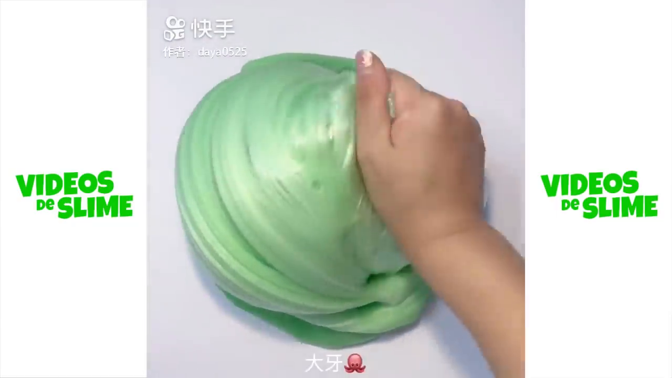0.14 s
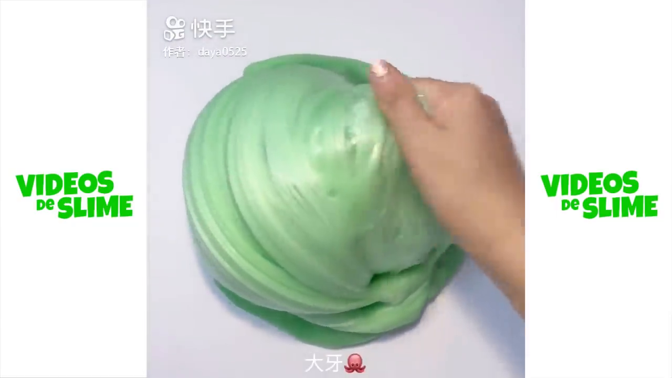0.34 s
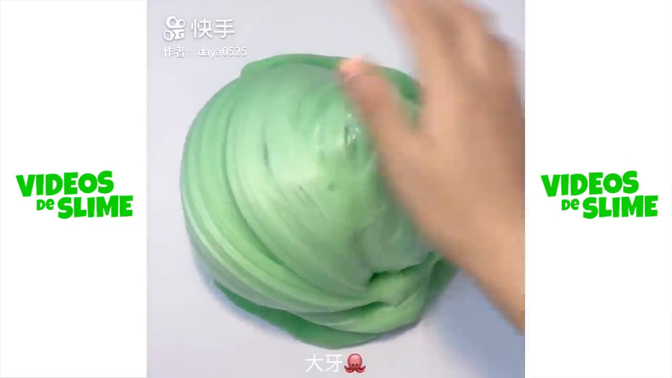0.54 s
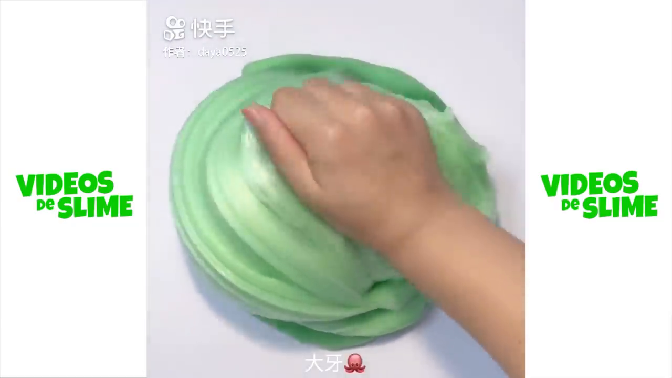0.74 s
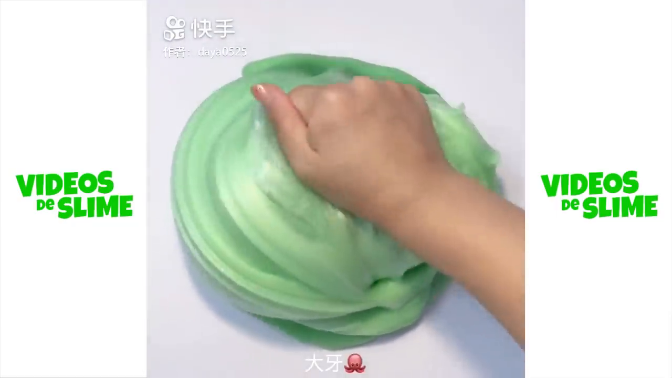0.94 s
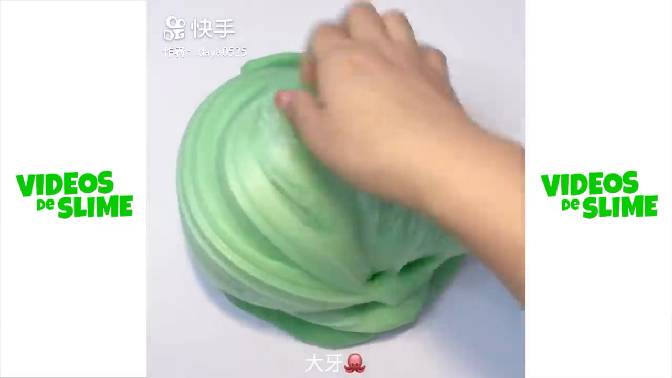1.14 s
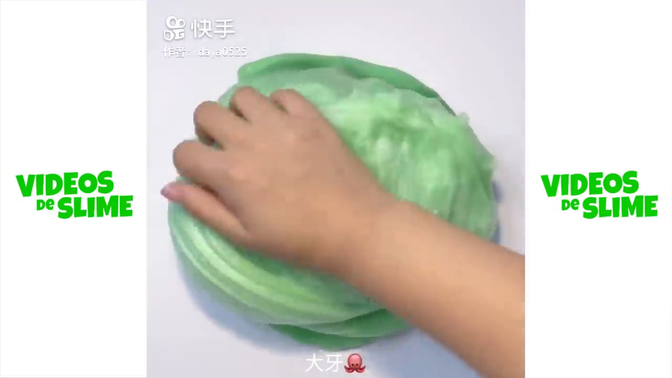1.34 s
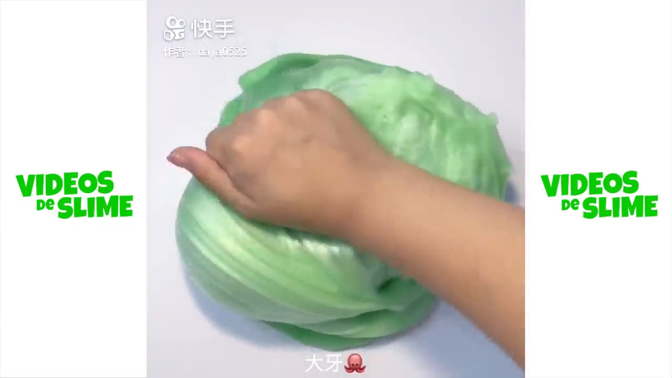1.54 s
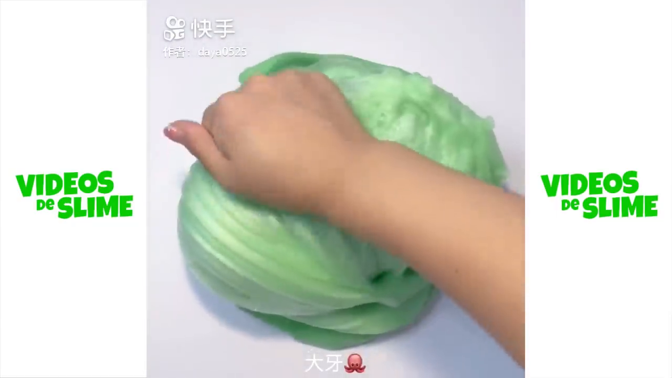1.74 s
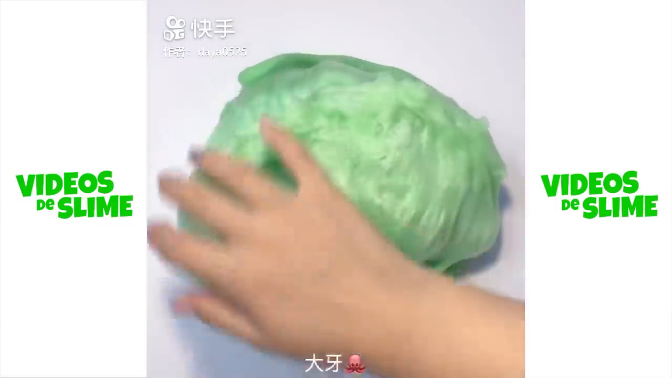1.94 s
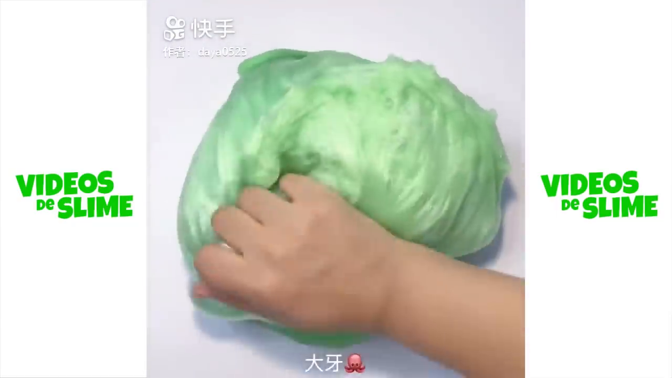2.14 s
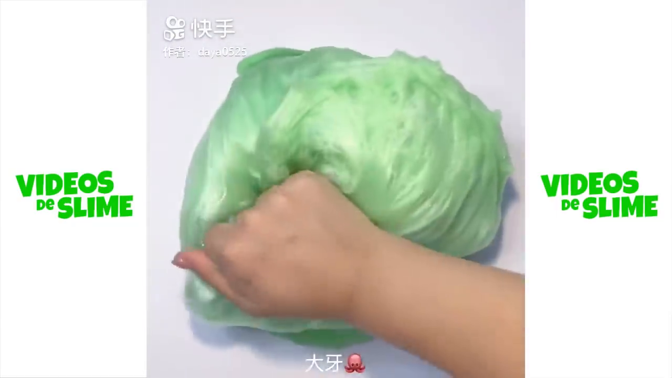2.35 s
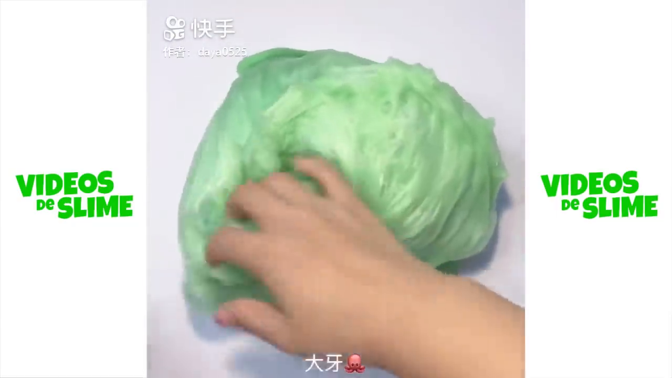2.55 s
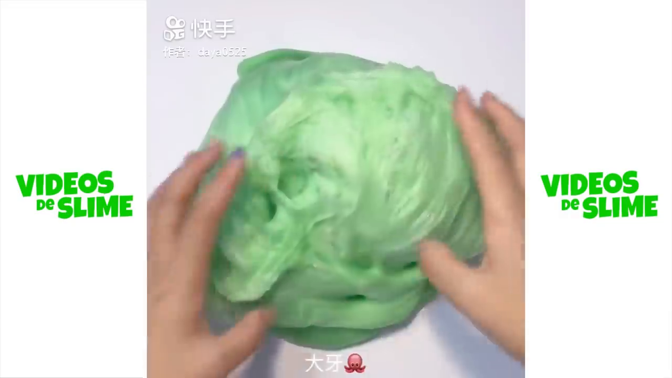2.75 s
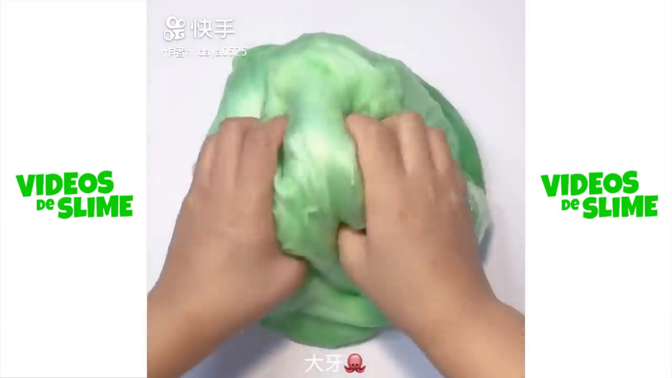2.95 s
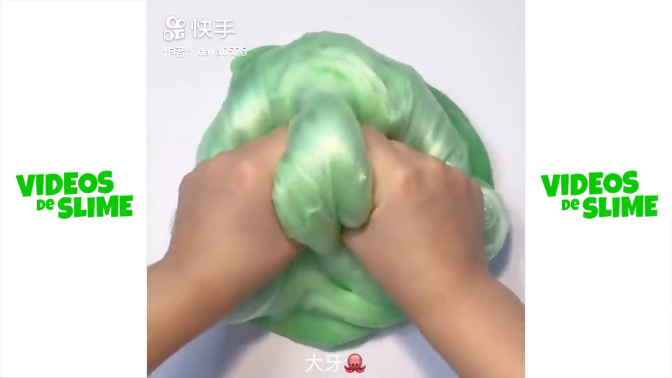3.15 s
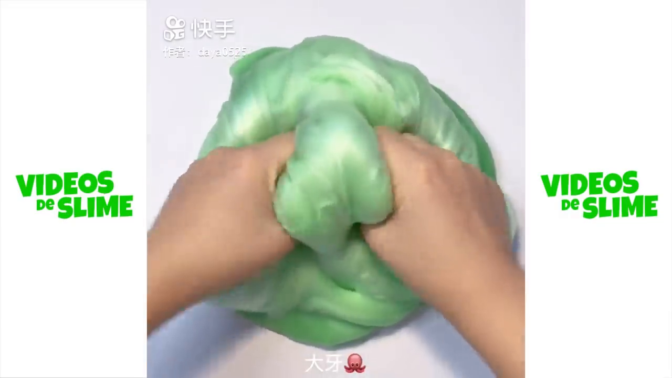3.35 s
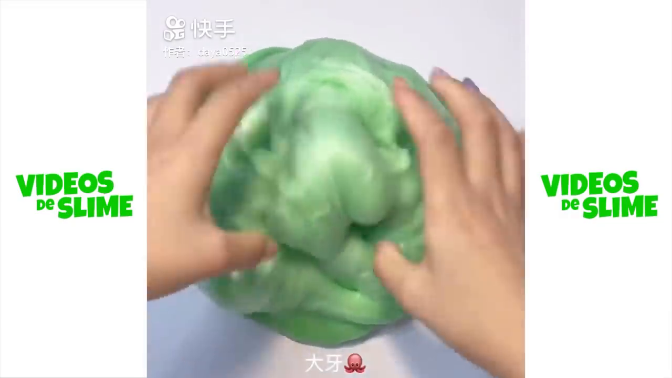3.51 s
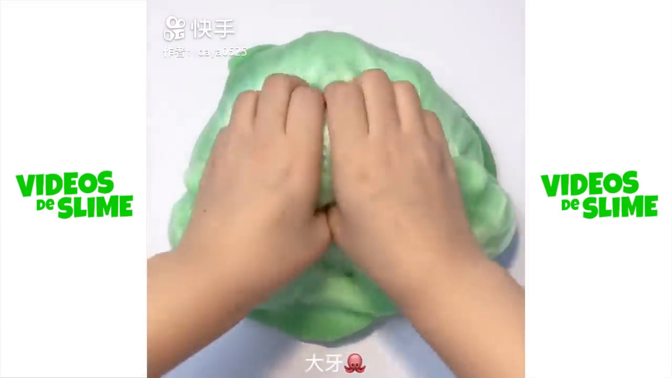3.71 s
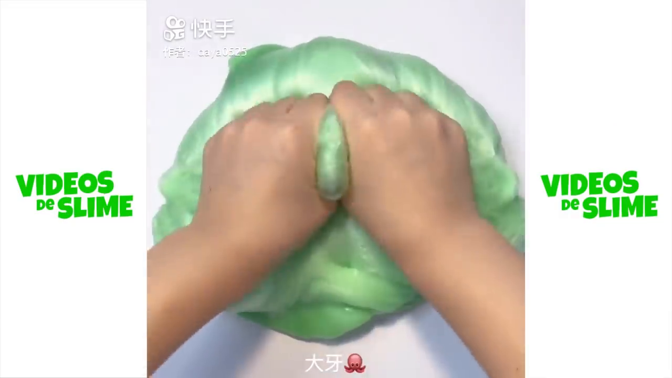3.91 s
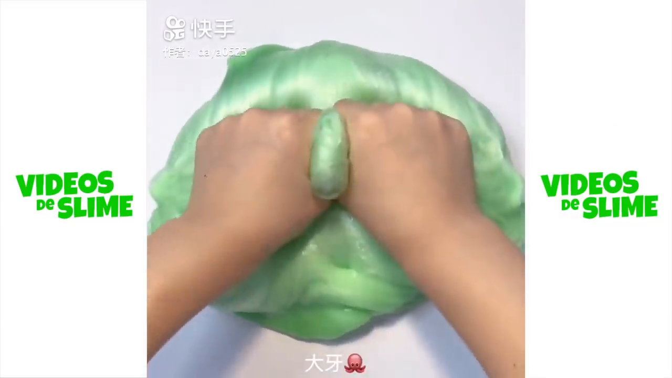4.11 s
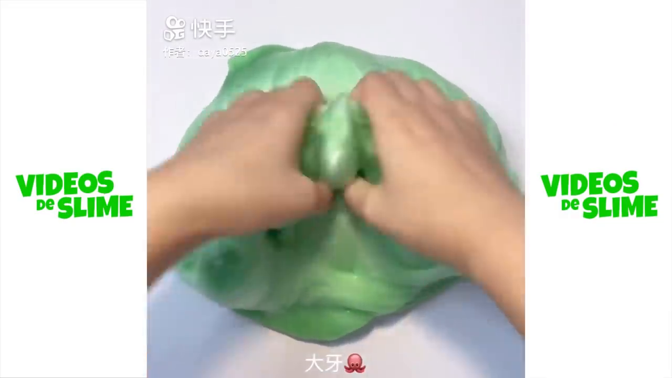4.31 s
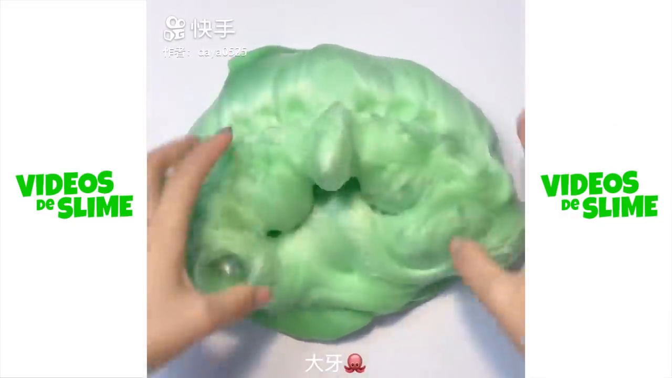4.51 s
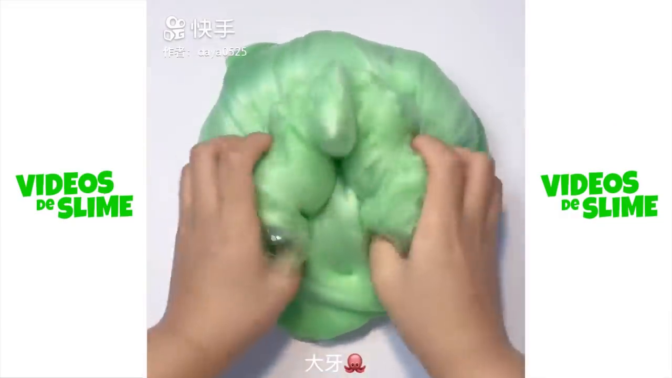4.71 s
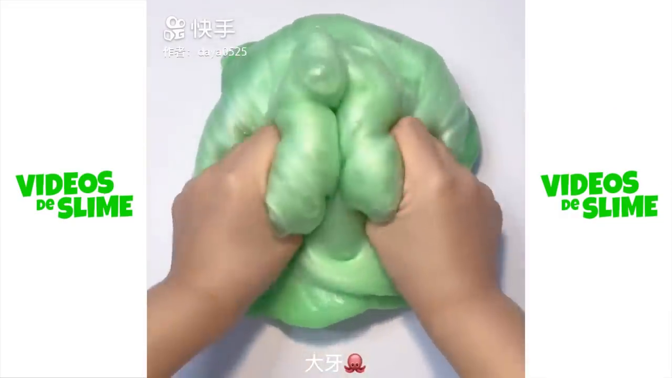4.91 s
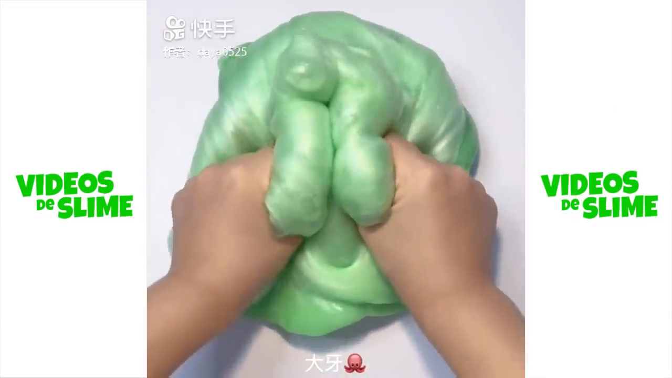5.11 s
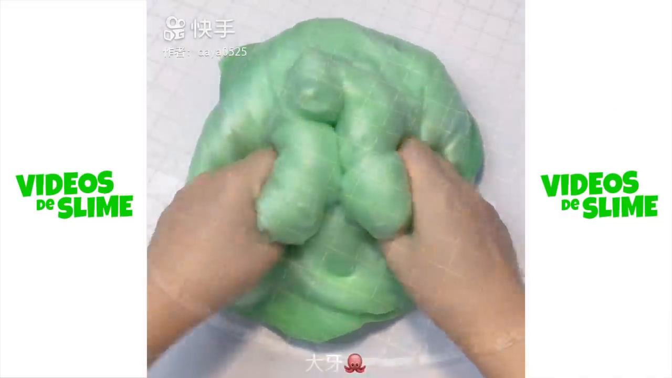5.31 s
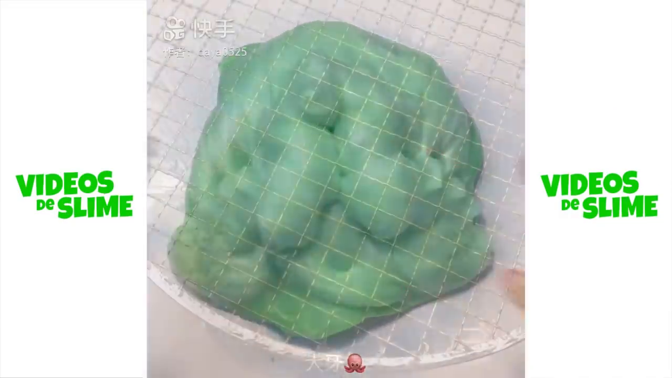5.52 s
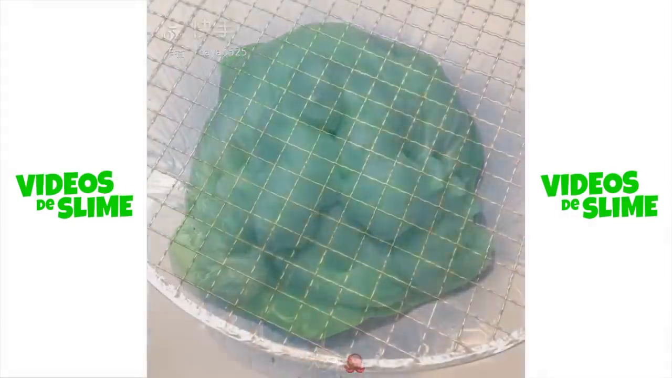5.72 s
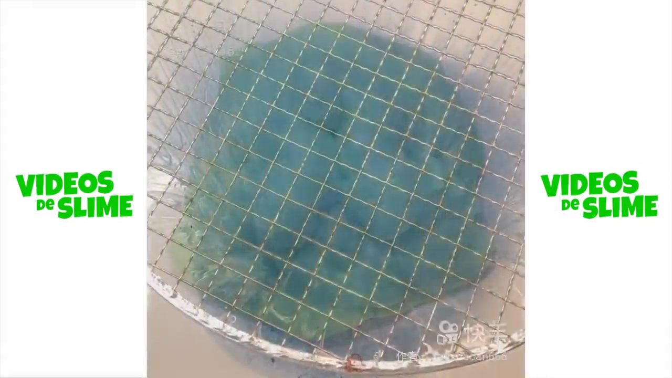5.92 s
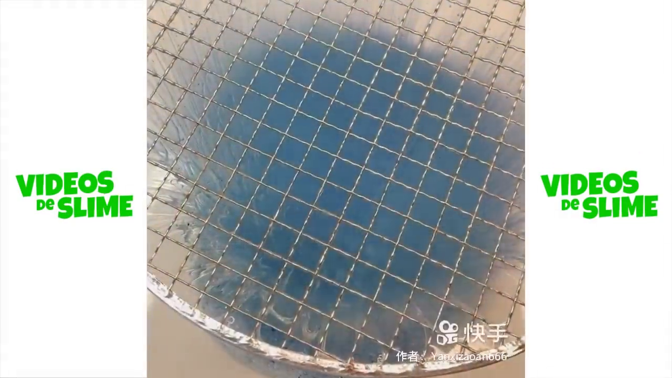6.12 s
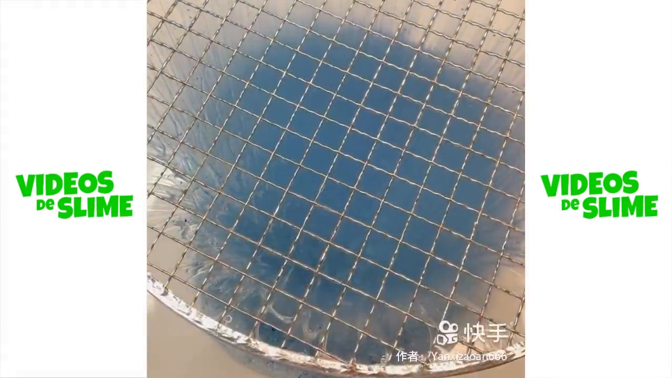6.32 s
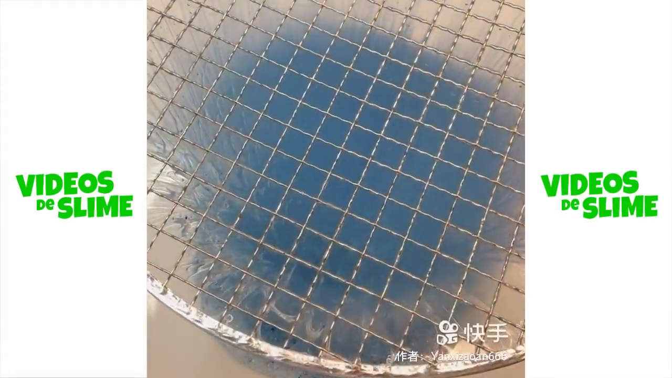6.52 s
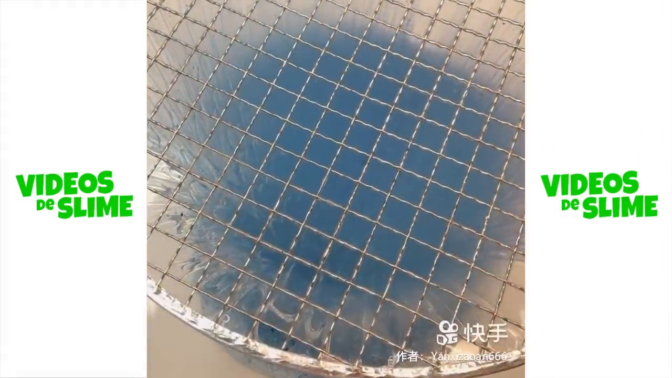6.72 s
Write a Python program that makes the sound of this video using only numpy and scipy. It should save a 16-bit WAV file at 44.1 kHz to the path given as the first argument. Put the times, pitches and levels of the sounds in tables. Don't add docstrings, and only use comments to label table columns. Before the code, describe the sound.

Hands squeeze a big lump of foamy slime up close, bursting air pockets in sharp crackling pops over bubbly fizz, then it cuts to near silence.

```python
import sys
import numpy as np
from scipy import signal
from scipy.fft import rfft, irfft, next_fast_len
from scipy.io import wavfile
from scipy.ndimage import uniform_filter1d, map_coordinates

SR = 44100
rng = np.random.default_rng(int(sys.argv[2]) if len(sys.argv) > 2 else 0)


def elevation(decibels):
    levels = np.asarray(decibels, float)
    return 10 ** (levels / 20)


def pcm_store(signal):
    levels = np.round(np.clip(np.atleast_2d(signal), -1, 1) * 32767)
    wavfile.write(sys.argv[1], SR, levels.astype(np.int16).T)


N = 302524


def unit(x):
    return x / np.sqrt(np.mean(x ** 2, axis=-1, keepdims=True) + 1e-20)


def along(points, hz):
    point_hz, value = np.transpose(points)
    return np.interp(np.log(hz + 1), np.log(point_hz + 1), value)


def curves(rows):
    s, *cols = np.transpose(rows)
    return [np.interp(np.arange(N) / SR, s, c) for c in cols]


def wobble(rate_hz):
    knots = rng.standard_normal(int(N * rate_hz / SR) + 4)
    return map_coordinates(knots, [np.arange(N) * rate_hz / SR])


def filtered(x, response):
    m = next_fast_len(x.shape[-1] + 4096)
    spectrum = rfft(x, m) * response(np.fft.rfftfreq(m, 1 / SR))
    return irfft(spectrum, m)[..., :x.shape[-1]]


def resonance(f, centre_hz, width_hz):
    return 1j * f * width_hz / (centre_hz ** 2 - f * f + 1j * f * width_hz)


def scattered(rows, seconds):
    at = np.round(seconds * SR).astype(int)[:, None] + np.arange(rows.shape[1])
    return np.bincount(at.ravel(), rows.ravel(), N + SR)[:N]


def swells(peak_s, level_db, rise_s, fall_s, bend, off_s=np.inf):
    span_db, stop_s = 30, 0.03
    t = np.arange(0, N, 64) / SR
    column = lambda v: np.reshape(v, (-1, 1))
    late = t - column(peak_s)
    flank_s = np.where(late < 0, column(rise_s), column(fall_s)).clip(.005)
    away = (np.abs(late) / flank_s) ** bend
    away = away + (t - column(off_s)).clip(0) / stop_s
    power = (elevation(column(level_db) - span_db * away) ** 2).sum(axis=0)
    return np.interp(np.arange(N) / SR, t, power)


# start in seconds, rms level in dB,
# cavity in Hz, life in ms.
RIM_GRIP_POPS = [(0.0148, -40, 3490, 2.8), (0.0544, -36.5, 8500, 5.5), (0.1374, -39, 3765, 0.92),
                 (0.1776, -14.5, 2800, 4.7), (0.1936, -21.5, 6790, 4.9), (0.224, -13, 5650, 4.5),
                 (0.2401, -12.5, 7520, 3.8), (0.2485, -6, 6760, 7.4), (0.2633, -14, 7330, 7.4),
                 (0.281, -12.5, 3340, 6.1), (0.3018, -13, 6480, 4), (0.3094, -18, 7700, 3.9),
                 (0.3194, -20, 1430, 0.87), (0.3368, -15.5, 7500, 6), (0.3479, -15.5, 5640, 5.3),
                 (0.3874, -13.5, 9000, 4.7), (0.3986, -23, 6760, 20), (0.4143, -32, 5240, 30)]
TOP_GRIP_POPS = [(0.8095, -45, 1050, 9.1), (0.841, -30, 7200, 5.2), (0.027, -43.5, 7000, 4),
                 (0.8648, -20, 3320, 4.3), (0.8985, -20, 2200, 9.5), (0.9089, -7, 7580, 8.9),
                 (0.9413, -13.5, 2014, 3.4), (0.9562, -16, 8720, 16), (0.9799, -20.5, 8260, 4.3),
                 (0.9863, -21, 8620, 11), (1.0043, -16, 8430, 10), (1.0159, -25, 9360, 19),
                 (1.974, -26.5, 1500, 2.5), (1.065, -19, 10700, 12), (1.0695, -18.5, 7030, 4.4),
                 (1.0805, -15.5, 7580, 4.8), (1.1584, -8, 7080, 5.1), (1.172, -19.5, 7150, 12)]
FAR_GRIP_POPS = [(1.455, -34.5, 1855, 6.7), (1.4912, -38, 1820, 8.4), (1.5789, -22, 2630, 4.7),
                 (1.5892, -21.5, 1295, 6.7), (1.633, -18, 7350, 2.5), (1.637, -23.5, 2680, 5.2),
                 (1.66, -20.5, 9310, 12), (1.675, -16.5, 9080, 12), (1.6935, -19.5, 7480, 7),
                 (1.703, -22, 1454, 4.6), (1.711, -10, 7800, 4.4), (1.723, -19, 7510, 38),
                 (1.7861, -17.5, 8550, 21), (1.8, -23, 9250, 43), (1.9284, -26, 3790, 3.9)]
NEAR_GRIP_POPS = [(2.2405, -32.5, 8400, 13), (2.2638, -21.5, 4950, 3.7), (2.2855, -16.5, 8500, 1.6),
                  (2.3109, -16.5, 5200, 4.6), (2.3212, -12.5, 5500, 5), (2.3437, -1, 4770, 1.4),
                  (2.357, -15.5, 6650, 11), (2.297, -33, 5000, 3.2), (2.3817, -20.5, 6100, 8.6),
                  (2.017, -37.5, 3000, 3), (2.4219, -22.5, 6960, 16), (2.433, -21.5, 9460, 7.5),
                  (2.449, -17.5, 7650, 2.7), (2.4708, -27, 1120, 12), (2.4775, -17.5, 8010, 3.5),
                  (2.5168, -11.5, 4300, 6.4), (2.5266, -19.5, 6900, 8.7)]
SIDE_SQUEEZE_POPS = [(2.9346, -44, 4440, 2.5), (2.949, -39, 6670, 4.2), (2.9828, -17.5, 7160, 2.7),
                     (3.0338, -29.5, 1640, 2.5), (3.045, -37, 7950, 7.4), (3.083, -23.5, 7550, 9.6),
                     (3.861, -36.5, 7500, 2), (3.125, -28, 8230, 4), (3.146, -18, 9720, 4.8),
                     (3.1677, -19, 7600, 5.4), (3.181, -10.5, 3470, 7.6), (3.214, -23.5, 6930, 9.6),
                     (3.2233, -14.5, 4000, 4.7), (3.2431, -18, 6500, 15), (3.257, -22.5, 5230, 32),
                     (3.279, -18.5, 2150, 2.8), (3.2856, -19, 2130, 2.4), (3.318, -16, 8740, 3.4),
                     (3.3572, -22.5, 4760, 4.6), (3.3679, -21.5, 3830, 7.7), (3.4491, -25, 3560, 4.9),
                     (3.4945, -29.5, 3520, 3.3), (3.526, -28, 2760, 23)]
FLAT_SQUEEZE_POPS = [(3.7747, -30.5, 7360, 5.4), (3.815, -36, 1600, 2.8), (3.823, -28, 2280, 4.5),
                     (3.847, -30.5, 5580, 4.3), (3.8742, -21.5, 7400, 2.3), (3.967, -34, 1740, 34),
                     (3.973, -24.5, 2930, 2.4), (3.984, -27.5, 1267, 4.9), (3.9936, -22.5, 2950, 1.6),
                     (4.022, -18, 7810, 13), (4.1133, -14, 7810, 1.8), (4.13, -19, 4710, 1.1),
                     (4.1494, -18.5, 7060, 17), (4.1805, -25, 4990, 1.7), (4.184, -29, 7650, 6.1),
                     (4.1921, -14, 8400, 3), (4.2322, -15.5, 5850, 6.3), (4.303, -31.5, 7570, 2.4),
                     (4.3851, -29, 2292, 4.9)]
LAST_SQUEEZE_POPS = [(4.711, -45, 3080, 3.9), (4.73, -38.5, 5610, 5.2), (4.7368, -34.5, 6250, 1.7),
                     (4.752, -35.5, 6100, 4.9), (4.762, -35, 5620, 6.5), (4.7945, -36, 1168, 1.7),
                     (4.818, -22.5, 5800, 6.3), (4.8245, -23, 7950, 5.3), (4.844, -26.5, 7840, 4.1),
                     (4.855, -28, 1070, 4.5), (4.8644, -21.5, 9020, 9.2), (4.896, -22.5, 8400, 1.3),
                     (4.591, -46, 9010, 3), (4.9216, -16.5, 966, 30), (4.9564, -13, 7690, 2.5),
                     (4.9655, -15, 7220, 4.6), (4.999, -22, 6270, 4.5), (5.01, -16.5, 7400, 7.1),
                     (5.0373, -4, 7750, 0.76), (5.046, -17.5, 1142, 13), (5.102, -18, 7200, 15),
                     (5.1212, -17.5, 5200, 7.3), (5.134, -22, 6770, 8.2), (5.151, -27.5, 1304, 3.3),
                     (5.18, -28, 8110, 3.5), (5.199, -26, 10630, 4.6), (5.2302, -34.5, 4310, 3.3),
                     (5.2756, -21, 7120, 1.7), (5.2815, -28, 8280, 7.2), (5.3206, -16, 3880, 4.2)]
# start in seconds, rms level in dB, cavity in Hz, life in ms.
BETWEEN_POPS = [(0.1524, -40, 8268, 17), (0.2026, -38.5, 6445, 5.8), (0.4143, -28, 1717, 2.7),
                (0.858, -26, 6960, 6.6), (3.958, -37, 4000, 3), (1.036, -21, 7150, 9.2),
                (1.0538, -22, 8740, 5.9), (2.22, -40.5, 7500, 2), (2.371, -24.5, 4280, 14.1),
                (2.3924, -20, 6718, 7.7), (2.4028, -23.5, 6120, 25), (2.2777, -30, 7000, 1.5),
                (2.9613, -39, 6287, 5), (3.949, -35, 5000, 3.4), (3.1124, -30, 3940, 6.6),
                (3.16, -27.5, 3445, 7.3), (3.34, -32, 5000, 3), (4.0063, -24, 5280, 2.9),
                (4.0844, -25, 1037, 11), (4.175, -25, 8370, 7.7), (4.776, -37, 5000, 3.6),
                (4.914, -24, 6100, 19), (4.9745, -23.5, 5630, 5.9), (2.629, -34, 2500, 3),
                (5.337, -41, 4000, 3), (5.209, -34.5, 6900, 6.0), (5.419, -33.5, 5720, 11),
                (5.454, -33.5, 1710, 14.1), (5.5251, -30, 6201, 14), (5.5949, -29, 3280, 43)]
# start in seconds, rms level in dB, cavity in Hz, life in ms.
STRAY_POPS = [(0.608, -36, 3300, 8), (0.778, -50, 3100, 5), (0.791, -48, 6000, 3), (1.444, -46, 3000, 8),
              (1.482, -40.5, 1800, 4), (1.507, -43.5, 1900, 4), (2.175, -49.5, 1500, 8),
              (.895, -15, 3980, 2.5)]
# frequency in Hz, density in dB per Hz.
BURST_SPECTRUM = [(290, -13), (500, -8.5), (898, -4.5), (1040, -1), (2610, -3), (8180, -5.5), (12000, -8.5),
                  (16500, -15.5)]
# frequency in Hz, density in dB per Hz.
SQUELCH_SPECTRUM = [(50, -46), (150, -11), (300, 3), (400, -0.5), (600, -6), (900, -11.5), (1500, -31)]


def pops():
    grips = [RIM_GRIP_POPS, TOP_GRIP_POPS, FAR_GRIP_POPS, NEAR_GRIP_POPS]
    squeezes = [SIDE_SQUEEZE_POPS, FLAT_SQUEEZE_POPS, LAST_SQUEEZE_POPS]
    rows = np.vstack(grips + squeezes + [BETWEEN_POPS, STRAY_POPS])
    s, db, hz, life_ms = np.transpose(rows)[:, :, None]
    t, life_s, rise_s = np.arange(2048) / SR, life_ms / 1000, 0.00036
    air = rng.standard_normal((len(s), 2, len(t)))
    neck_hz = 5200 * np.exp(0.47 * np.clip(air[:, 1, :1], -1.5, 1.5))

    def colour(f):
        cavity = 1.3 * resonance(f, hz, .14 * hz + 350) * (6000 / hz) ** .6
        neck = .4 * resonance(f, neck_hz, .18 * neck_hz)
        return elevation(along(BURST_SPECTRUM, f)) * (.33 + cavity + neck)

    hiss = unit(filtered(air[:, 0], colour))
    hold = elevation(-9.5 * (t / life_s) ** 2.2)
    hiss_shape = hold + elevation(-19 - 60 * t / .07) + .8 * elevation(-60 * t / .004)
    rise = 1 - np.exp(-(t / rise_s) ** 2)
    cycles = (t - .0006) * hz
    snap = elevation(9) * np.sin(2 * np.pi * cycles) * np.exp(-3 * cycles ** 2)
    thump = unit(filtered(air[:, 1], lambda f: elevation(along(SQUELCH_SPECTRUM, f))))
    thump_db = -13.0 - 4.7 * np.log2(hz / 4000) - 9 * t / (life_s + 0.00079)
    thump = thump * elevation(thump_db) * (1 - np.exp(-t / rise_s))
    fade = np.cos(np.pi / 2 * t / t[-1])
    return scattered(elevation(db) * (hiss * hiss_shape * rise + snap + thump) * fade, s[:, 0])


# centre in seconds, peak in dB, note
# in Hz, length in ms.
SLIME_NOTES = [(0.2545, -23, 370, 9.5), (1.088, -17.5, 384, 9.3), (1.1735, -18, 1807, 17.6),
               (1.6032, -15.5, 263, 19), (2.3246, -19.5, 380, 6.6), (2.3596, -13, 431, 6.3),
               (3.093, -21, 506, 6.2), (3.19, -18, 235.4, 24.2), (3.5302, -16, 393, 6.5),
               (1.087, -17.5, 276, 15.7), (4.047, -20, 108, 24), (4.0622, -9, 295.4, 8.5),
               (4.9225, -12.5, 842, 5), (4.9244, -4.5, 499, 6.9), (4.99, -16, 481, 6.8),
               (5.07, -15.5, 595, 7.3), (5.1219, -13.5, 4560, 6.6), (5.1363, -14, 7500, 6.8),
               (5.4666, -18, 249, 20),
               (0.185, -27, 256, 15.5), (0.2525, -19.5, 650, 12.8), (0.2645, -29.5, 227, 36),
              (0.3433, -28.5, 255, 19), (0.865, -30, 786, 12.6), (0.8748, -27, 225, 16.7),
              (0.9031, -30.6, 680, 13), (0.9058, -24.5, 455, 19), (0.9117, -18, 262, 24.5),
              (0.9511, -23, 264, 20), (3.566, -21.5, 1630, 18.6), (1.124, -30.5, 195, 26),
              (1.1756, -31.5, 172, 24), (1.2399, -30.5, 279, 30), (1.5036, -30.5, 237, 15.5),
              (1.686, -25.5, 218, 43), (1.7327, -27, 195, 28), (1.82, -26, 249, 29), (1.9115, -31, 241, 25),
              (1.9748, -28.5, 270, 33), (2.3592, -21, 270, 11), (2.5197, -28, 393, 21.8),
              (2.7007, -38, 366, 81), (3.2867, -31.5, 260, 29), (3.5802, -24.5, 190, 43),
              (3.6696, -24, 148, 13), (3.9198, -25, 300, 24), (3.994, -24.5, 277, 25),
              (4.1152, -23.5, 780, 11.4), (4.5032, -27, 174, 21.4), (4.544, -27, 173, 24.5),
              (5.287, -31.5, 1200, 6), (5.103, -27, 171, 34), (5.5063, -21, 153, 31),
               (0.1572, -33, 8268, 2.0), (0.2504, -7.5, 3445, 3.1), (0.2525, -12, 1119, 5.7),
                (0.3898, -21.5, 4651, 6.2), (0.3895, -18.5, 5512, 6.0), (3.286, -20, 1950, 8),
                (0.8997, -19.5, 2411, 3.4), (0.8994, -14, 1291, 4.9), (0.9088, -8, 8010, 3.1),
                (0.9612, -15.5, 4995, 8.5), (0.99, -15.5, 5081, 2.1), (1.0049, -14.5, 2411, 4.0),
                (1.0087, -13, 3186, 2.8), (1.0155, -6.5, 9474, 7.4), (1.0379, -13, 7235, 1.3),
                (1.0703, -17, 7579, 3.5), (1.6613, -17, 9302, 2.1), (1.6942, -11.5, 1464, 4.5),
                (1.6952, -15.5, 7665, 2.0), (1.7932, -8, 6718, 1.1), (1.8038, -11, 6632, 1.8),
                (1.8054, -14, 9130, 2.0), (2.3221, -12, 8613, 1.0), (3.57, -21.5, 2150, 7),
                (2.3569, -14, 1808, 5.5), (2.394, -10.5, 6632, 1.8), (2.3934, 0, 8699, 0.9),
                (2.403, -22.5, 6029, 2.9), (2.4478, -16.5, 7062, 1.4), (2.5183, -16.5, 6804, 1.2),
                (3.1631, -21, 3531, 3.3), (3.2488, -18, 4306, 5.9), (3.5632, -19.5, 3273, 5.5),
                (4.0374, -14.5, 1291, 5.0), (4.0385, -13.5, 3445, 2.7), (4.0424, -10, 4565, 2.1),
                (4.0462, -12, 1981, 3.9), (4.0524, -16.5, 3445, 5.2), (4.0812, -18, 3445, 3.7),
                (4.089, -12.5, 7062, 1.2), (4.1306, -13.5, 4306, 4.8), (4.4471, -18.5, 1894, 4.1),
                (4.8483, -22, 1119, 4.8), (5.0519, -13, 3445, 2.4), (5.108, -11, 4651, 2.6),
                (5.5291, -22.5, 6201, 4.6)]


def plops():
    rows = np.array(SLIME_NOTES)
    s, db, hz, length_ms = np.transpose(rows)[:, :, None]
    t = np.arange(-1024, 1024) / SR
    step = t / (length_ms / 1000)
    sink_hz = 110 * step
    phase = 2 * np.pi * np.cumsum(hz - sink_hz, axis=1) / SR
    return scattered(elevation(db + 0.5 - 96 * step ** 2) * np.sin(phase), s[:, 0] + t[0])


def bubbles(count, spread_db, life_s):
    when, size = rng.random((count, 2)).T
    puff_db = -spread_db * np.log(size + .008)
    starts = np.bincount((when * N).astype(int), elevation(puff_db) ** 2, N)
    power = signal.lfilter([1], [1, -np.exp(-1 / (life_s * SR))], starts)
    return unit(np.sqrt(power) * rng.standard_normal(N))


def patchy(x, depth_db):
    z = signal.stft(x, nperseg=256)[2]
    field = uniform_filter1d(rng.standard_normal(z.shape), size=7, axis=0)
    field = uniform_filter1d(field, size=5, axis=1)
    return signal.istft(z * elevation(depth_db * field / field.std()), nperseg=256)[1][:N]


# peak in seconds, fizz in dB, rise in seconds, fall in seconds, squelch in dB.
FINGER_PRESSES = [(0.031, -55, 0.31, 0.43, -48), (.26, -29, 0.13, 0.54, -37), (.92, -30, 0.12, 0.6, -32.5),
                  (1.455, -52.5, 0.025, 0.17, -46.5), (1.69, -24, 0.092, 0.34, -34),
                  (1.809, -29, 0.3, 0.16, -47.5), (2.362, -30, 0.19, 0.44, -30),
                  (3.0, -49.5, 0.21, 0.92, -64), (3.209, -24, 0.19, 0.29, -27.5),
                  (3.88, -42.5, 0.21, 0.69, -45.5), (4.047, -17, 0.074, 0.24, -24),
                  (4.9, -33.5, 0.24, 0.72, -40.5), (5.06, -27, 0.26, 0.11, -28)]
# peak in seconds, fizz in dB, rise in seconds,
# seconds until the skin lets go, squelch in dB.
SKIN_PEELS = [
    (0.548, -34.5, 0.19, 0.081, -42),
    (1.249, -34.5, 0.092, 0.082, -42.5),
    (1.965, -31, 0.1, 0.079, -40.5),
    (2.701, -28, 0.15, 0.048, -35),
    (3.556, -25, 0.11, 0.096, -31),
    (4.456, -25, 0.11, 0.085, -33.5),
    (5.519, -26, .14, 0.12, -28),
]


def effort():
    press_bend, peel_bend = 1.09, 1.82
    press_bright_db, peel_bright_db, drained_db = 3.5, -4.5, 11.5
    rest_db, rest_squelch_db = -63.5, -76.5
    s, db, rise, fall, wet_db = np.transpose(FINGER_PRESSES)
    peel_s, peel_db, peel_rise, let_go, peel_wet_db = np.transpose(SKIN_PEELS)
    free_s, sag = peel_s + let_go, 1.59 * let_go
    hand_off_s = free_s[np.searchsorted(peel_s, s)]
    drain = 0.89 * fall
    press = swells(s, db, rise, fall, press_bend, hand_off_s)
    peel = swells(peel_s, peel_db, peel_rise, sag, peel_bend, free_s)
    wet_press = swells(s, wet_db, rise, drain, press_bend, hand_off_s)
    wet_peel = swells(peel_s, peel_wet_db, peel_rise, sag, peel_bend, free_s)
    drained = press - swells(s, db, rise, drain, press_bend, hand_off_s)
    dull = peel + elevation(rest_db) ** 2
    bright_db = press * press_bright_db + drained * drained_db + dull * peel_bright_db
    bright_db = bright_db / (press + dull)
    squelch = np.sqrt(wet_press + wet_peel + elevation(rest_squelch_db) ** 2)
    return np.sqrt(press + dull), squelch, bright_db


# frequency in Hz, density in dB per Hz.
FIZZ_SPECTRUM = [(350, -28), (600, -17.5), (1040, 1.5), (1630, 2), (9400, -0.5), (10000, -5.5),
                 (13000, -9.5), (16500, -22.5)]


def leak(crackle, s, db, fall_s, hz):
    sings = lambda f: .15 + sum(np.abs(resonance(f, k * hz, 220)) for k in range(1, 6))
    hiss = unit(filtered(crackle, lambda f: elevation(along(FIZZ_SPECTRUM, f)) * sings(f)))
    return np.sqrt(swells(s, db, 0.024, fall_s, 1.09, s + fall_s / 2)) * hiss


# resonance in Hz, width in Hz, gain in dB.
FIXED_MODES = [(1600, 210, -11), (3410, 350, -6.5)]
# peak in seconds, level in dB, fall in seconds, cavity in Hz.
AIR_LEAKS = [
    (1.18, -27, 0.19, 1810),
    (2.535, -31, 0.11, 1770),
    (5.14, -38.5, 0.13, 7500),
]


def fizz():
    level, squelch, bright_db = effort()
    crackle = bubbles(count=12000, spread_db=1.1, life_s=0.0005) + .5 * rng.standard_normal(N)
    crackle = patchy(crackle, depth_db=2.4)
    fixed_colour = lambda f: 1 + sum(elevation(db) * resonance(f, hz, w) for hz, w, db in FIXED_MODES)
    crackle = filtered(crackle, fixed_colour)
    low_share = lambda f: 1 / (1 + (f / 3000) ** 3)
    dull = filtered(crackle, lambda f: elevation(along(FIZZ_SPECTRUM, f)) * low_share(f))
    bright = filtered(crackle, lambda f: elevation(along(FIZZ_SPECTRUM, f)) * (1 - low_share(f)))
    foam = dull * elevation(-bright_db / 2) + bright * elevation(bright_db / 2)
    foam = foam / np.std(dull + bright)
    folds = bubbles(count=1500, spread_db=4.5, life_s=0.0077)
    wet = unit(filtered(folds, lambda f: elevation(along(SQUELCH_SPECTRUM, f))))
    flicker_db = 1.2 * wobble(40)
    leaks = sum(leak(crackle, *row) for row in AIR_LEAKS)
    return level * elevation(flicker_db) * foam + squelch * wet + leaks


# frequency in Hz, width in Hz, gain in dB.
TABLE_LOW_MODES = [(117.9, 6.3, -0.5), (62.9, 41, -26)]
# frequency in Hz, width in Hz, gain in dB.
TABLE_UPPER_MODES = [(162.3, 13, 5.5), (218, 33, 1), (263, 40, -2.5)]
# peak in seconds, lowest modes in dB, upper modes in dB.
TABLE_SHOVES = [(.22, -41.5, -42), (.56, -38, -35), (0.953, -35, -29), (1.17, -34.5, -33.5),
                (1.298, -37.5, -37), (1.6, -60.5, -32), (1.81, -42.5, -35.5), (1.988, -38.5, -35),
                (2.3, -42.5, -38.5), (2.41, -40.5, -38), (2.7, -32, -31.5), (3.1, -54, -41),
                (3.192, -35.5, -28.5), (3.56, -33.5, -24), (3.7, -45, -59), (4.073, -30, -18.5),
                (4.46, -33.5, -22), (4.921, -31, -40), (5.069, -35.5, -32.5), (5.467, -40.5, -41),
                (5.58, -30.5, -36.5)]


def table():
    shake = bubbles(count=1500, spread_db=0.5, life_s=0.000569)

    def ring(modes):
        response = lambda f: sum((-1) ** k * elevation(db) * resonance(f, hz, w)
                                 for k, (hz, w, db) in enumerate(modes))
        x = unit(filtered(shake, response))
        envelope = np.sqrt(np.abs(uniform_filter1d(x * x, size=3000)))
        return unit(x / (envelope + 0.4))

    s, low_db, upper_db = np.transpose(TABLE_SHOVES)
    rest_low_db, rest_upper_db = -52, -53.5
    low = np.sqrt(swells(s, low_db, rise_s=0.099, fall_s=0.34, bend=1) + elevation(rest_low_db) ** 2)
    upper = np.sqrt(swells(s, upper_db, rise_s=0.1, fall_s=0.18, bend=1) + elevation(rest_upper_db) ** 2)
    return low * ring(TABLE_LOW_MODES) + upper * ring(TABLE_UPPER_MODES)


# frequency in Hz, t60 in seconds.
WALL_T60 = [(200, 0.18), (2000, 0.15), (12000, 0.23)]


def walls(x):
    hz, t, z = signal.stft(rng.standard_normal(SR // 4), SR, nperseg=256)
    decay = elevation(-60 * t / along(WALL_T60, hz)[:, None])
    tail = signal.istft(z * decay, SR, nperseg=256)[1]
    return signal.fftconvolve(np.pad(x, (150, 0)), tail / np.linalg.norm(tail))[:N]


# frequency in Hz, density in dB per Hz.
ROOM_SPECTRUM = [(12, -42), (30, -14), (53, -1.5), (77, -20), (124, -12), (169, -21), (400, -30),
                 (12500, -48.5)]
# time in seconds, gain in dB.
ROOM_GAIN = [
    (5.706, -5),
    (5.712, -69),
    (5.738, -66),
    (5.75, 6),
]
# start in seconds, peak in dB.
RACK_TICK = [
    (5.792, -45),
]


def background():
    top_back_s, top_off_hz = 6.025, 9700
    ring_hz, ring_db, ring_t60_s = 1100, -77, 2.5
    air = unit(filtered(rng.standard_normal(N), lambda f: elevation(along(ROOM_SPECTRUM, f))))
    change_s = ROOM_GAIN[-1][0]
    since = np.arange(N) / SR - change_s
    gone = (since > 0) & (since < top_back_s - change_s)
    air = air - gone * filtered(air, lambda f: f > top_off_hz)
    tick_s, tick_db = RACK_TICK[0]
    t = np.arange(600) / SR
    tick = rng.standard_normal(len(t)) * elevation(-60 * t / 0.048)
    tick = filtered(tick, lambda f: resonance(f, 6700, 3180) ** 3 * (f < top_off_hz))
    tick = scattered(elevation(tick_db) * tick[None], np.array([tick_s]))
    ring = unit(filtered(rng.standard_normal(N), lambda f: resonance(f, ring_hz, 110) ** 2))
    ring = ring * (since > 0) * elevation(ring_db - 60 * since.clip(0) / ring_t60_s)
    return elevation(-67.5 + curves(ROOM_GAIN)[0]) * air + ring + tick


def scene():
    burst = pops() + fizz()
    slime = burst + elevation(-18) * walls(burst) + plops() + table()
    before_change = np.clip((5.71 - np.arange(N) / SR) / 0.0031, 0, 1)
    return (slime * before_change + background())[None]


def band_limit(x):
    return signal.sosfilt(signal.butter(12, 16970, fs=SR, output="sos"), x)


def record(dry):
    overload, top_hz = .27, 15790
    clipped = dry / (1 + np.abs(dry / overload) ** 8) ** (1 / 8)
    mix = filtered(clipped, lambda f: 1 / (1 + (f / top_hz) ** 800))
    return band_limit(mix)


dry = scene()
out = record(dry)
pcm_store(out)
```